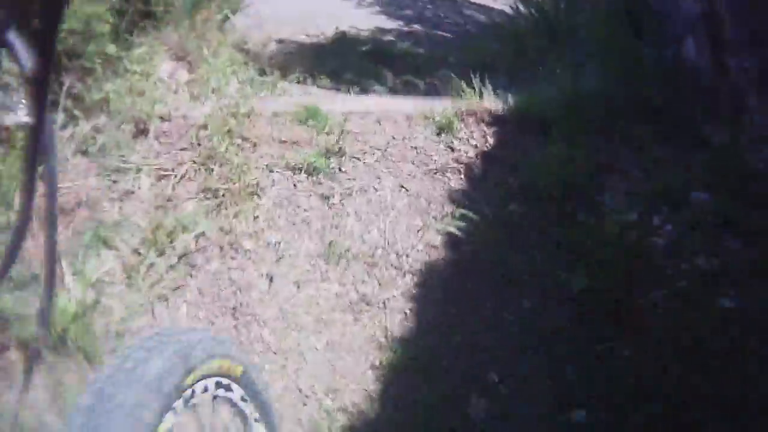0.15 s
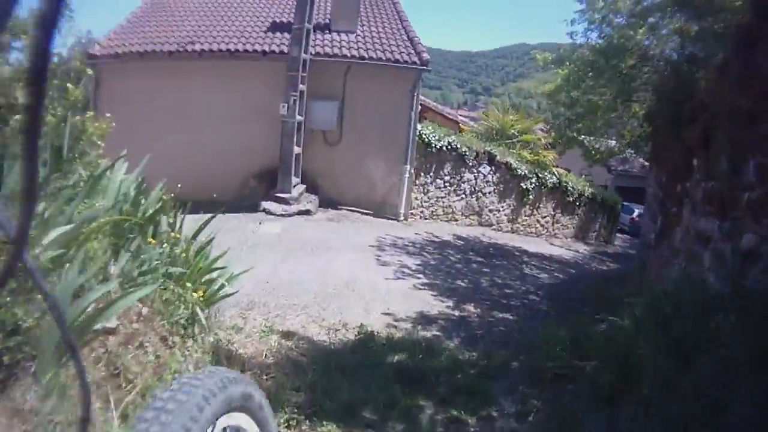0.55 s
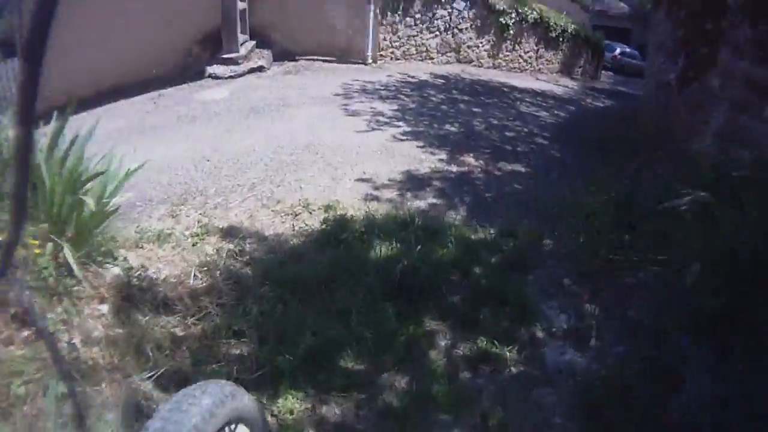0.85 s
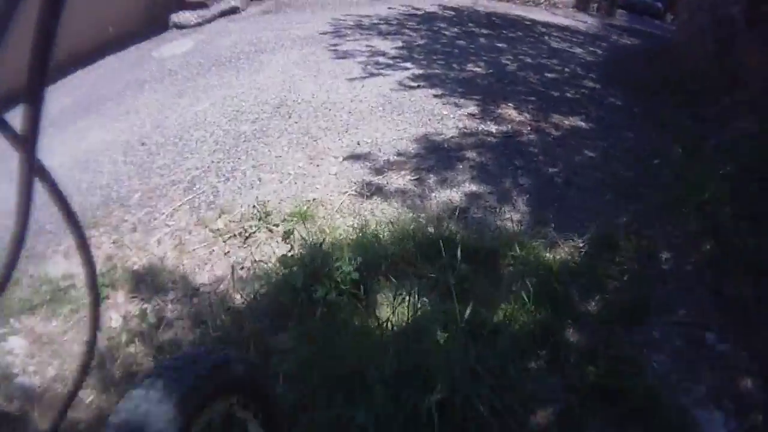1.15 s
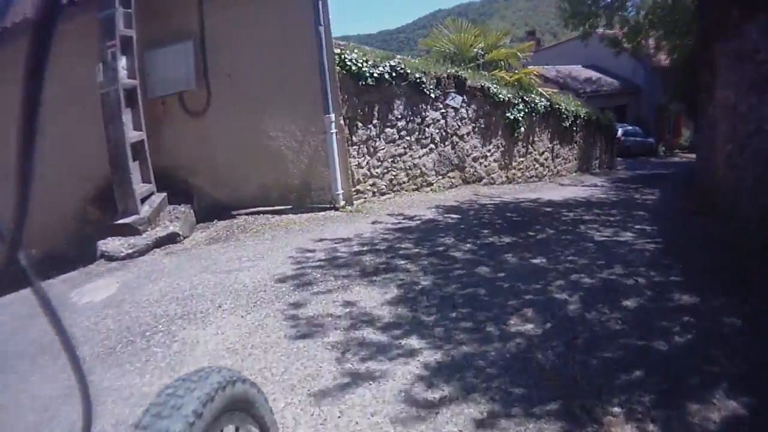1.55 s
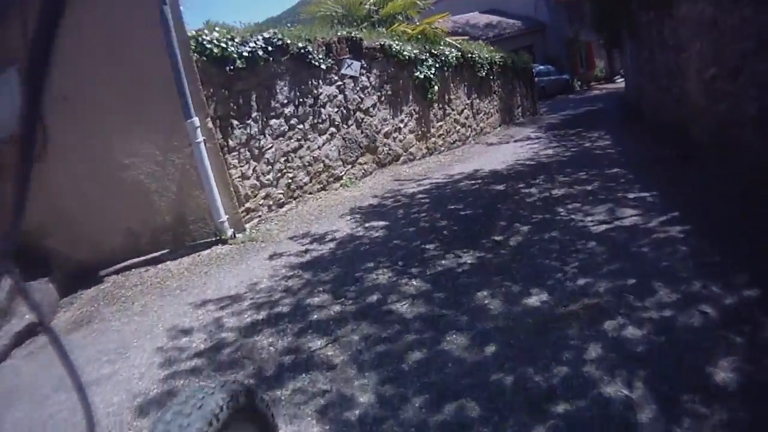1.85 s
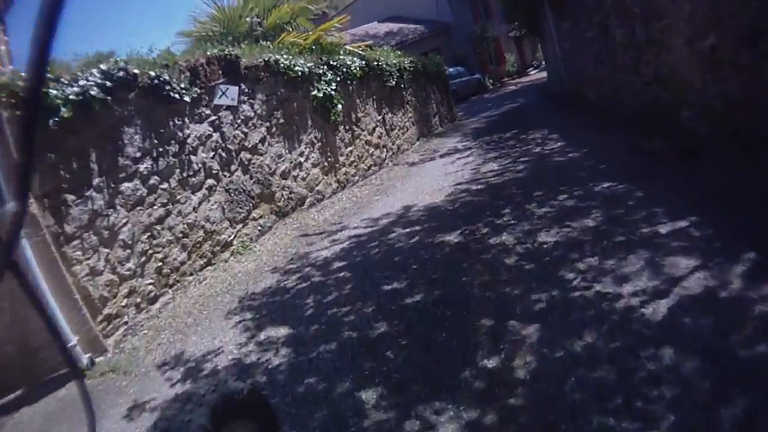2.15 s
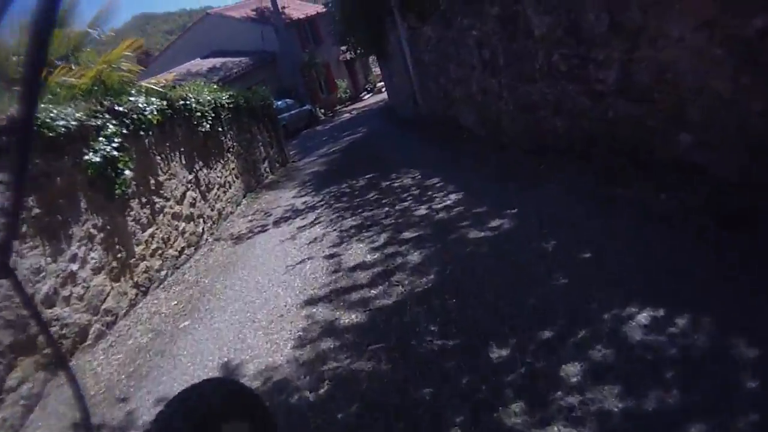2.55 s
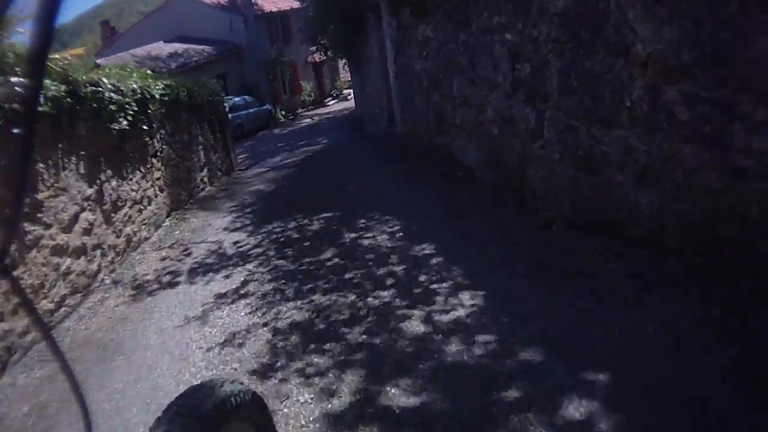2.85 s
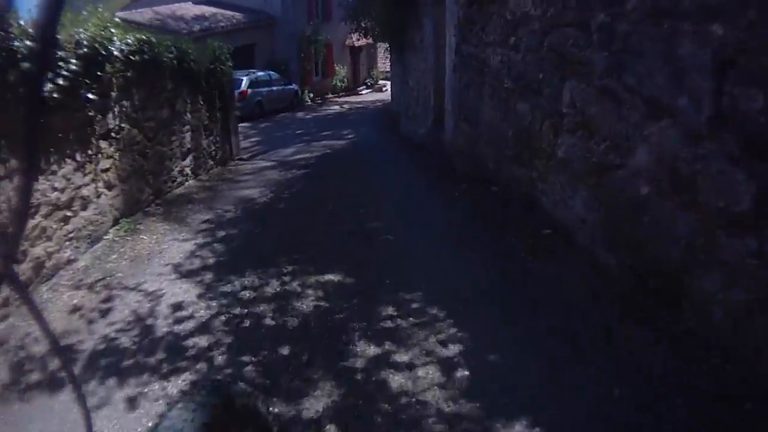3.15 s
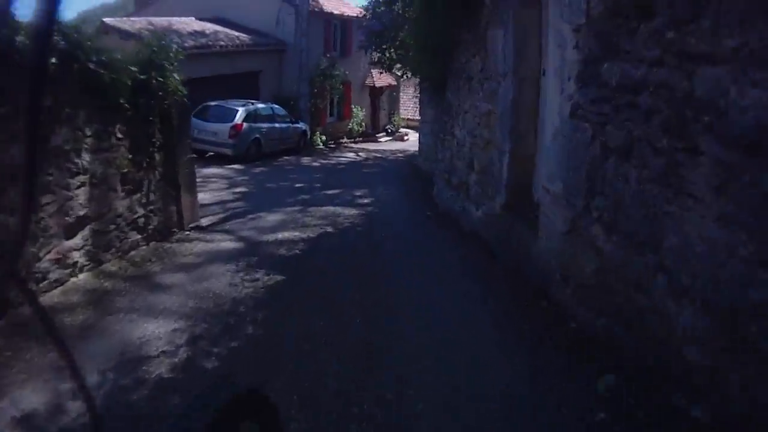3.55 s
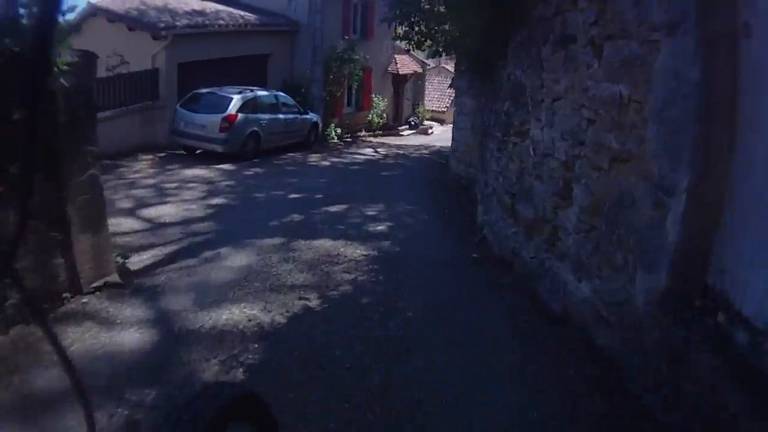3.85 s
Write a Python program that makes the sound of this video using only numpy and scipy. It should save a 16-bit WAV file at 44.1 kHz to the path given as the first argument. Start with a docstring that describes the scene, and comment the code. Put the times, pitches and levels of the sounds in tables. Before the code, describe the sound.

A bicycle on rough dirt gives dense, hard, dry clacks and chatter from 0 to 0.45 s, with a dull thud near the start. It eases until 0.8 s, then a very loud, overloaded crack at 1.1 s begins more clatter until about 1.8 s. On pavement, sparse ticks and hollow housing knocks continue, briefly busier at 2.4 and 3.2 s, over low tyre and wind rumble; a bright tick ends it.

```python
"""Loud, crowded clacks come first: a bicycle rolls down a rough dirt path, heard from a camera riding on it.
From about 1.8 s it rolls along coarse pavement. Jolts make loose hard parts clack, short noisy contacts ringing
sharp modes, and make the camera's housing knock hollowly through lower modes. On the roughest ground the parts
chatter. Tyres and wind rumble underneath as shaped noise, and the hardest blows overload the single microphone."""
import sys
import numpy as np
from scipy import signal
from scipy.io import wavfile
from scipy.ndimage import uniform_filter1d

SR = 44100
rng = np.random.default_rng(int(sys.argv[2]) if len(sys.argv) > 2 else 0)


def store_wav(level_fs):
    """Save 16-bit WAV to argv[1]."""
    pcm = np.round(np.clip(np.atleast_2d(level_fs), -1, 1) * 32767)
    wavfile.write(sys.argv[1], SR, pcm.T.astype(np.int16))


N = 176400   # samples, 4 s
AGE = np.arange(2400) / SR - .008   # seconds since contact in every short sound; it starts 8 ms early
IMPACT = np.arange(2400) == 353   # a single sharp tap at age zero
LIGHT_DB = -20   # a light blow, the reference for everything that grows with force

# What the loose parts ring with.
# Each row: pitch in Hz, strength in dB, time to fade by 60 dB in seconds.
RINGING_PARTS = [(815, -3, 0.0078), (1546, -1.5, 0.0046), (1840, 0.5, 0.0029), (2730, -2.5, 0.0082),
                 (3110, -5.5, 0.0056), (4790, -2, 0.0024), (6330, -3, 0.002), (8210, -6, 0.00067),
                 (12200, -12.5, 0.00033)]
PART_DETUNE_OCT = .045   # typical random shift of pitch at each contact


def ring_parts(force, vary_db):
    """Loose hard parts ring briefly in several modes when a force drives them."""
    return ring(force, RINGING_PARTS, vary_db, PART_DETUNE_OCT)


LEAD_IN_S, LEAD_IN_DB = 0.005, -24   # faint noise swelling just before each crack
CLACK_SCATTER_S, CRACK_DB = 0.00062, 12   # spread of the tiny impacts; the main crack among them
HARD_DB = -6.5   # above this level the tiny impacts spread out for longer
BOUNCE_S, BOUNCE_DB = 0.0029, -13.5   # average delay; each bounce comes at 0.5 to 1.5 times this
AFTER_S, AFTER_DB = .008, -30   # fine buzz after a clack
BRIGHT_HZ = 4280   # brightness sets the level above this pitch against the level below


def clack_sounds(db, bright_db):
    """A hard contact is a faint swell of noise, one crack with a scatter of tiny impacts, a bounce and a buzz."""
    scatter_s = CLACK_SCATTER_S * from_db(np.maximum(db - HARD_DB, 0))[:, None]
    scatter = np.exp(-abs(AGE) / scatter_s)
    since_bounce = AGE - BOUNCE_S * (.5 + rng.random((len(db), 1)))
    bounce = from_db(BOUNCE_DB) * np.exp(-abs(since_bounce) / CLACK_SCATTER_S)
    after = from_db(AFTER_DB) * np.exp(-AGE / AFTER_S)
    lead_in = from_db(LEAD_IN_DB) * np.exp(-abs(AGE) / LEAD_IN_S)
    envelope = np.where(AGE < 0, lead_in, scatter + bounce + after)
    force = envelope * rng.standard_normal(envelope.shape) + from_db(CRACK_DB) * IMPACT
    sound = ring_parts(force, vary_db=2.5)
    # Level the two halves separately, over 4 ms, so brightness is set exactly before they are joined.
    low = peak_one(band(sound, BRIGHT_HZ, "low", order=3), size=176)
    high = peak_one(band(sound, BRIGHT_HZ, "high", order=3), size=176)
    return peak_one(low + from_db(bright_db)[:, None] * high, size=176)


CLACK_DB = -0.5   # added to every clack
ANSWER_DB, ANSWER_LAG_S = -17, 0.00202   # the housing's knock after a light clack, before KNOCK_DB
ANSWER_GROWTH = 0.46   # extra dB per dB of clack above LIGHT_DB
# The loose parts strike.
# Each row: time in seconds, level in dB before CLACK_DB, brightness in dB (treble against the rest).
PART_STRIKES = [(0.025, -5.5, -3), (0.0426, -2.5, -5), (0.054, -18, -20), (0.081, -5.5, 2),
                (0.0905, -5, -6.5), (0.1072, -3.5, -12), (0.1222, -5, 1), (0.1349, -10, -15),
                (0.1556, -4, -2), (0.1697, -5.5, -4), (0.1877, -10.5, -5), (0.22, -2.5, -9.5),
                (0.2307, -9, -9), (0.2509, -9, -6.5), (0.2753, -13, -1), (0.287, -10, 0), (0.302, -25, -1),
                (0.3395, -0.5, -7), (0.3601, -2, -3), (0.3726, -5.5, -13), (0.39, -12, 0),
                (0.4032, -13, -14), (0.463, -16, -10), (0.611, -19.5, -8.5), (0.6255, -20.5, -32),
                (0.6437, -19.5, -11), (0.7904, -8.5, 1), (0.8147, -14, -5), (0.881, -39, -6),
                (0.9057, -6, 1), (0.945, -16.5, -3), (1.012, -19.5, -9), (1.047, -28, -11),
                (1.1216, 4, -1.5), (1.135, -11.5, -5), (1.1408, -5, -2), (1.1646, -15.5, -1),
                (1.1852, -19, 13), (1.2271, -3, 0), (1.25, -10, -8), (1.305, -16, -11), (1.3171, -10.5, 4),
                (1.328, -11, 6), (1.3372, -19, -7), (1.3532, -3, -6.5), (1.3716, -10.5, 5),
                (1.382, -3.5, -3), (1.4076, -10, 3), (1.4458, -4.5, 10.5), (1.5314, -19, 2),
                (1.598, -25, -5), (1.6364, -13.5, -12), (1.6821, -10, 1), (1.6923, -9.5, 2),
                (1.7067, -15, -16), (1.7218, -10, -4), (1.7529, -6, -5), (1.7694, -6.5, -12.5),
                (1.8017, -14, -2.5), (1.8131, -16.5, -7), (1.947, -25, 2), (2.0073, -24.5, -6),
                (2.04, -28.5, -10), (2.1397, -27, -6), (2.3644, -21, -8), (2.3892, -9.5, 9),
                (2.4108, -28, 18), (2.4226, -12, -3), (2.4577, -13, -18), (2.483, -13.5, -11.5),
                (2.612, -23, 1), (2.7, -26.5, -14), (2.7485, -24, -7), (2.7864, -15.5, -1.5),
                (2.821, -27, -10), (2.879, -21.5, -1), (2.9816, -22, -5.5), (3.2183, -16, 21),
                (3.2444, -13.5, -15), (3.2649, -13.5, -4), (3.293, -20.5, -1), (3.325, -16.5, 0),
                (3.356, -27, -15), (3.3864, -21.5, -4), (3.436, -19, 2), (3.48, -14.5, 6),
                (3.4896, -16.5, -5), (3.5467, -14.5, -1), (3.5649, -14, -26), (3.5782, -13.5, -2),
                (3.5956, -19.5, 0), (3.651, -23.5, -16), (3.685, -24, -17), (3.749, -18.5, -14),
                (3.7796, -13.5, 2.5), (3.8077, -16.5, -3), (3.842, -30, -12), (3.8693, -23, -6.5),
                (3.907, -24.5, -2), (3.9751, -7.5, 31)]


def clacks():
    """The loose parts hit their stops, and the housing answers each with a knock."""
    s, db, bright_db = np.transpose(PART_STRIKES)
    hits = place(s, db + CLACK_DB, clack_sounds(db, bright_db))
    answer_db = ANSWER_DB + ANSWER_GROWTH * (db - LIGHT_DB)
    return hits + place(s + ANSWER_LAG_S, answer_db + KNOCK_DB, knock_sounds(len(s)))


CHATTER_PER_S, CHATTER_BRIGHT_DB = 190, -9
# Stretches where the parts chatter without rest.
# Each row: start in seconds, length in seconds, middle level in dB.
CHATTER_STRETCHES = [(.05, 0.15, -24), (.345, .09, -25.5), (1.125, 0.047, -24), (1.35, 0.053, -20),
                     (1.68, .13, -32), (2.378, 0.049, -23.5)]


def chatter():
    """On the roughest ground the parts never settle: dense small contacts crunch between the clacks."""
    contacts = []
    for start, length, db in CHATTER_STRETCHES:
        for t in np.arange(start, start + length, 1 / CHATTER_PER_S):
            contacts.append((t, db))
    s, db = np.transpose(contacts)
    late, strength = rng.uniform(-1, 1, (len(s), 2)).T
    s = s + .5 * late / CHATTER_PER_S
    db = db + 5 * strength
    return place(s, db, clack_sounds(db, np.full(len(s), CHATTER_BRIGHT_DB)))


KNOCK_SPREAD_S, KNOCK_CORE_DB = 0.0018, 15.5   # the scatter of force; the one main impact in it
KNOCK_LOW_CUT_HZ, KNOCK_SOFT_HZ = 152, 1530   # the knock is kept between these pitches
KNOCK_DETUNE_OCT = .04   # typical random shift of pitch at each knock
# What the housing rings with.
# Each row: pitch in Hz, strength in dB, time to fade by 60 dB in seconds.
RINGING_HOUSING = [(245, -15, 0.0084), (380, -11, 0.012), (513.3, -1, 0.014), (630.5, 0.5, 0.011),
                   (849, -8.5, 0.014)]


def knock_sounds(count):
    """The housing answers a jolt hollowly, as low modes rung by an impact and a scatter of force."""
    force = push(count, KNOCK_SPREAD_S) + from_db(KNOCK_CORE_DB) * IMPACT
    rung = ring(force, RINGING_HOUSING, vary_db=3, detune_oct=KNOCK_DETUNE_OCT)
    sound = band(rung, [KNOCK_LOW_CUT_HZ, KNOCK_SOFT_HZ], "band")
    direction = rng.choice([-1, 1], (count, 1))
    return direction * peak_one(sound, size=265)


KNOCK_DB = -3.5   # added to the knocks below and to the answers after clacks
KNOCK_BUZZ_DB, KNOCK_BUZZ_GROWTH = -22, 0.9   # buzz against the knock; extra dB per dB above LIGHT_DB
BUZZ_S, BUZZ_DULL_HZ = 0.0063, 1900   # fading of the buzzing force; treble softens above this
BUZZ_LEAD_S = 0.001453   # the parts answer before the slow housing peaks
# Further hollow knocks of the housing, some alone, some together with a clack.
# Each row: time in seconds, level in dB before KNOCK_DB.
HOUSING_KNOCKS = [(0.191, -5.5), (.277, -7), (.421, -6), (0.478, -14.5), (.513, -12), (.582, -14),
                  (.634, -14.5), (.819, -4), (.932, -9), (.987, -12), (1.396, -7.5), (1.43, -12),
                  (1.47, -15), (1.498, -13.5), (1.589, -23), (1.682, -7), (1.791, -11), (1.854, -14.5),
                  (1.916, -12), (1.95, -14), (1.975, -13.5), (1.998, -14.5), (2.195, -18.5), (2.346, -14.5),
                  (2.367, -13.5), (2.412, -8), (2.417, -7.5), (2.448, -9), (2.469, -14.5), (2.574, -19.5),
                  (2.614, -11.5), (2.651, -18), (2.811, -13), (2.84, -14), (3.009, -15), (3.041, -20.5),
                  (3.094, -19), (3.116, -15.5), (3.219, -9.5), (3.379, -19), (3.539, -16.5), (3.596, -9.5),
                  (3.679, -12), (3.716, -14), (3.782, -10), (3.942, -15.5)]


def knocks():
    """Jolts ring the housing and set the parts buzzing, more so when hard."""
    s, db = np.transpose(HOUSING_KNOCKS)
    hollow = place(s, db + KNOCK_DB, knock_sounds(len(s)))
    buzz_force = (AGE > 0) * push(len(s), BUZZ_S)
    buzz = band(ring_parts(buzz_force, vary_db=5.5), BUZZ_DULL_HZ, "low", order=1)
    buzz_db = db + KNOCK_BUZZ_DB + KNOCK_BUZZ_GROWTH * (db - LIGHT_DB)
    return hollow + place(s - BUZZ_LEAD_S, buzz_db, peak_one(buzz, size=265))


THUD_S, THUD_LOW_CUT_HZ = 0.00043, 35   # rise and fall of the push; weakened below this pitch
# Two dull low thuds under the loud clacks.
# Each row: time in seconds, level in dB.
LOW_THUDS = [(0.043, -17), (.35, -31)]


def low_thuds():
    """Each dull thud is one short low push."""
    s, db = np.transpose(LOW_THUDS)
    bump = np.exp(-abs(AGE) / THUD_S)
    thud = peak_one(band(bump, THUD_LOW_CUT_HZ, "high"), size=600)
    return place(s, db, [thud] * len(s))


# How hard the ground shakes the bicycle.
# Each row: time in seconds, strength in dB; the layers below add their own offsets.
GROUND_SHAKE = [(0, -16.5), (.06, -14.5), (.24, -19), (.31, -24), (.38, -17.5), (.58, -28), (.66, -30),
                (.77, -30.5), (.83, -20), (.96, -20), (1.08, -30), (1.15, -16), (1.38, -18), (1.57, -23),
                (1.74, -19), (2.08, -30), (2.31, -27), (2.42, -24), (2.55, -27), (3.17, -29), (3.26, -23),
                (4, -24.5)]


def ground_shake_db(s):
    """The ground's shaking moves in straight lines between the rows of the table."""
    return np.interp(s, *np.transpose(GROUND_SHAKE))


def small_jolts(rate, spread_db):
    """The ground's grain gives unevenly spaced jolts, with levels that follow the shaking."""
    count = int(rate * N / SR)
    s = (np.arange(count) + rng.random(count)) / rate
    chance = np.clip(rng.standard_normal(count), -2, 2)
    return s, ground_shake_db(s) + spread_db * chance


SMALL_KNOCKS_PER_S, SMALL_KNOCK_DB = 58, -0.5
SMALL_TICKS_PER_S, SMALL_TICK_DB, SMALL_TICK_BRIGHT_DB = 70, -7.5, -10.5
TICK_GROWTH = 1   # extra dB per dB of small jolt above LIGHT_DB


def small_rattle():
    """The grain of the ground keeps up light knocks of the housing and ticks of the parts."""
    s, db = small_jolts(SMALL_KNOCKS_PER_S, spread_db=2.0)
    hollow = place(s, db + SMALL_KNOCK_DB, knock_sounds(len(s)))
    s, db = small_jolts(SMALL_TICKS_PER_S, spread_db=3.5)
    db = db + SMALL_TICK_DB + TICK_GROWTH * (db - LIGHT_DB)
    ticks = place(s, db, clack_sounds(db, np.full(len(s), SMALL_TICK_BRIGHT_DB)))
    return hollow + ticks


TYRE_DB, TYRE_PATCHY_DB = -31, 2   # level when the shaking is at LIGHT_DB; depth of flicker
# The tone of tyres crunching over the ground.
# Each row: pitch in Hz, relative strength in dB per Hz.
TYRE_TONE = [(40, -29), (300, -3.5), (580, 8), (1300, -18), (2750, -15), (6200, -32.5), (15000, -41)]


def tyres():
    """The tyres' crunch is flickering noise that swells with the shaking."""
    shake_db = ground_shake_db(np.arange(N) / SR) - LIGHT_DB
    return from_db(TYRE_DB + shake_db) * coloured_noise(TYRE_TONE, TYRE_PATCHY_DB)


WIND_DB = -39.5
# The tone of wind and hiss.
# Each row: pitch in Hz, relative strength in dB per Hz.
WIND_TONE = [(25, -8), (120, 3), (600, 0), (1500, -38), (5500, -30), (15000, -47)]


def wind():
    """Wind and hiss are noise that flickers a little but does not follow the shaking."""
    return from_db(WIND_DB) * coloured_noise(WIND_TONE, patchy_db=-2.0)


def from_db(db):
    """Turns dB into a plain multiplier."""
    return 10 ** (np.asarray(db) / 20)


def rms_one(x):
    """Scales a signal to an rms level of 1."""
    return x / np.sqrt(np.mean(x ** 2) + 1e-20)


def peak_one(x, size):
    """Each row gets rms 1 over its loudest stretch of size samples."""
    power = uniform_filter1d(x ** 2, size, axis=-1)
    return x / np.sqrt(power.max(-1, keepdims=True) + 1e-20)


def band(x, hz, kind, order=2):
    """Keeps the pitches below, above or between the given ones."""
    return signal.sosfilt(signal.butter(order, hz, kind, fs=SR, output="sos"), x)


def push(count, spread_s):
    """Uneven forces that swell to a peak and fall away."""
    return np.exp(-abs(AGE) / spread_s) * rng.standard_normal((count, len(AGE)))


def ring(force, modes, vary_db, detune_oct):
    """Each row of force rings the modes, each with a strength and pitch of its own; signs alternate."""
    out = np.zeros(force.shape)
    chances = rng.standard_normal((len(force), len(modes), 2))
    for row, chance in enumerate(chances):
        for k, (hz, db, t60) in enumerate(modes):
            pitch_hz = min(hz * 2 ** (detune_oct * chance[k, 0]), CUTOFF_HZ)
            w = 2 * np.pi * pitch_hz / SR
            r = from_db(-60 / (t60 * SR))   # fading per sample
            gain = (-1) ** k * from_db(db + vary_db * chance[k, 1])
            resonance = [1, -2 * r * np.cos(w), r * r]
            out[row] += gain * signal.lfilter([1, 0, -1], resonance, force[row] + 1e-18)
    return out


def place(times, db, sounds):
    """Lays short sounds on the time line, with age zero at the given times."""
    out = np.zeros(N + SR)
    for s, gain, sound in zip(times, from_db(db), sounds):
        i = max(int(s * SR), 0)
        out[i:i + len(sound)] += gain * sound
    return out[int(-AGE[0] * SR):][:N]


def drift(rate):
    """Slow chance with spread 1, moving at about rate Hz; made at every 40th sample and joined by lines."""
    r = np.exp(-80 * np.pi * rate / SR)
    noise = rng.standard_normal(N // 40 + 2002)
    slow = signal.lfilter([1], [1, -2 * r, r * r], noise)[2000:]   # skip the filter's start
    return np.interp(np.arange(N) / 40, np.arange(len(slow)), rms_one(slow))


def coloured_noise(spectrum, patchy_db):
    """Half-octave bands of noise that flicker, partly together; rms 1."""
    edges = 20 * 2 ** np.arange(0, 10, .5)
    hz, db = np.transpose(spectrum)
    white = rng.standard_normal((2, N))   # neighbouring bands take turns
    together = drift(19)
    out = 0
    for k, (low, high) in enumerate(zip(edges, edges[1:])):
        tone_db = np.interp(np.log(low * high) / 2, np.log(hz), db)
        flicker_db = patchy_db * (together + drift(4.2)) / 2
        out = out + from_db(tone_db + flicker_db) * band(white[k % 2], [low, high], "band")
    return rms_one(out)


def scene():
    """All of it reaches one microphone, alike in both channels."""
    parts = clacks() + chatter()
    blows = knocks() + low_thuds() + small_rattle()
    background = tyres() + wind()
    return np.tile(parts + blows + background, (2, 1))


OVERLOAD = 1.0   # the level that the microphone cannot pass
CUTOFF_HZ = 15700   # the top is cut here; no mode rings above it


def record(dry):
    """The microphone flattens the hardest blows; the top is cut."""
    flattened = dry / (1 + (dry / OVERLOAD) ** 6) ** (1 / 6)
    return signal.sosfiltfilt(signal.butter(12, CUTOFF_HZ, fs=SR, output="sos"), flattened)


dry = scene()
out = record(dry)
store_wav(out)
```